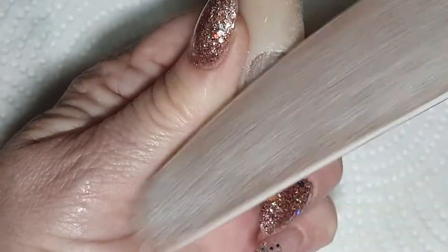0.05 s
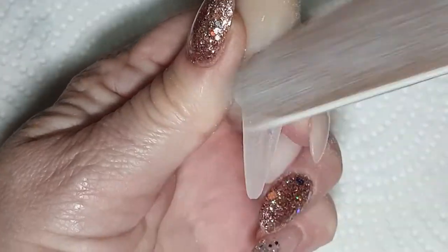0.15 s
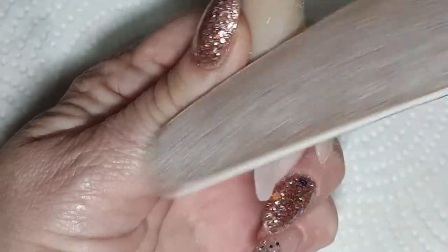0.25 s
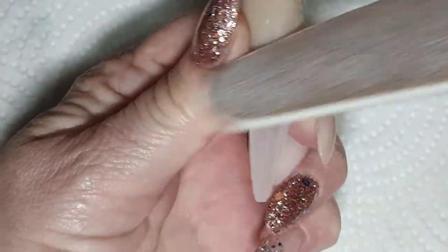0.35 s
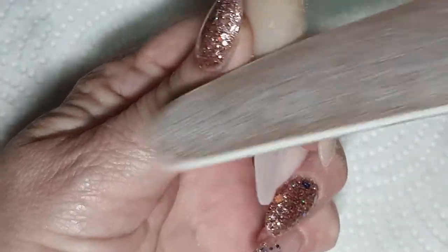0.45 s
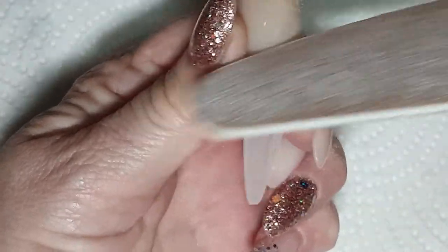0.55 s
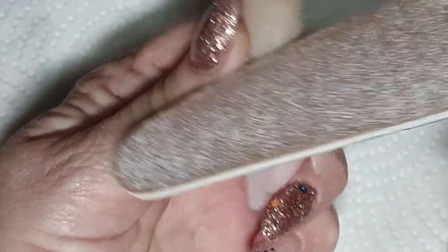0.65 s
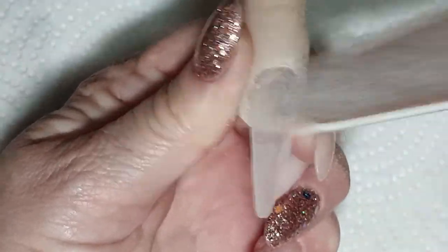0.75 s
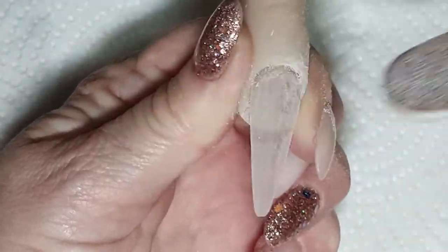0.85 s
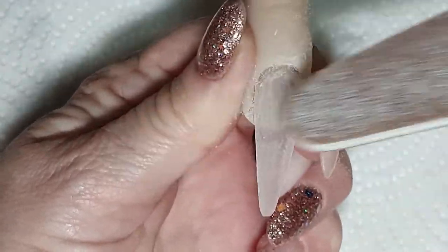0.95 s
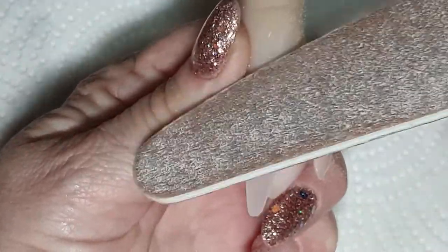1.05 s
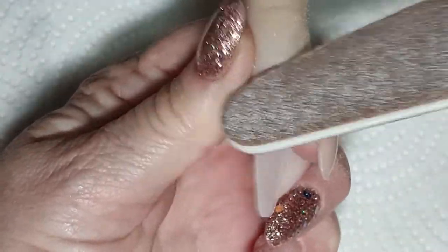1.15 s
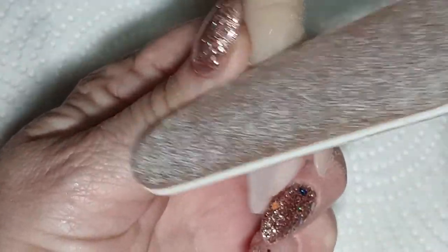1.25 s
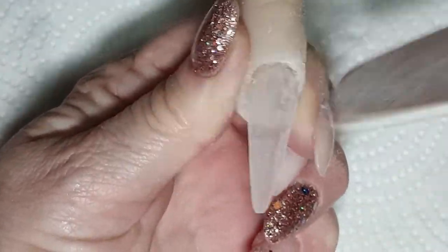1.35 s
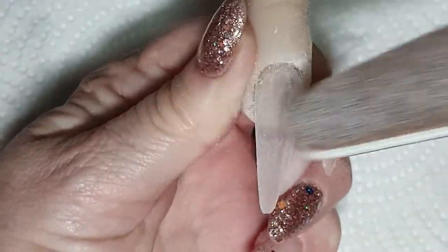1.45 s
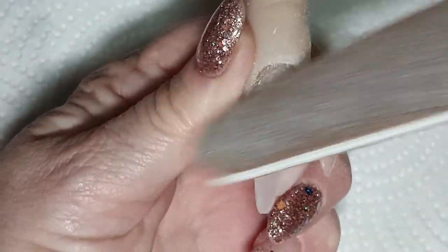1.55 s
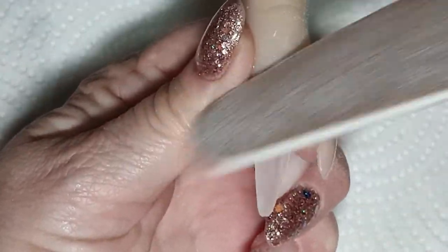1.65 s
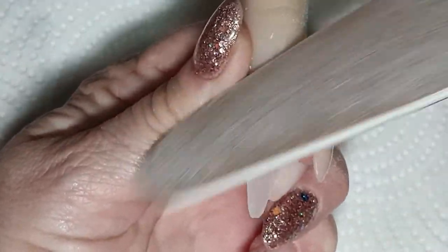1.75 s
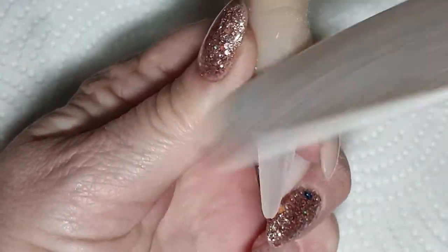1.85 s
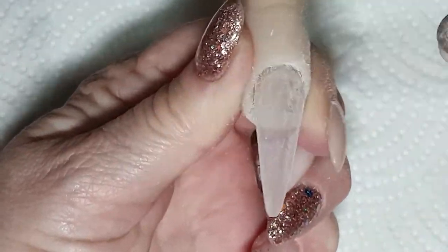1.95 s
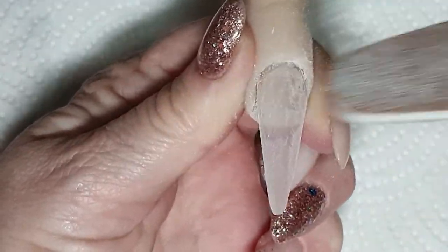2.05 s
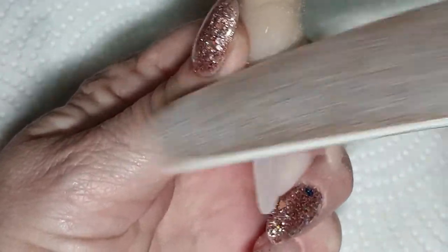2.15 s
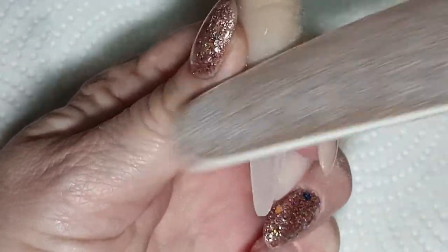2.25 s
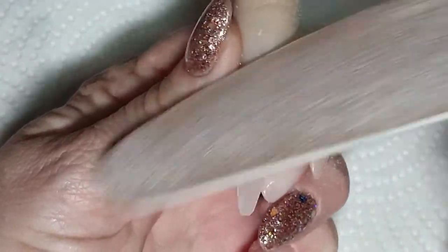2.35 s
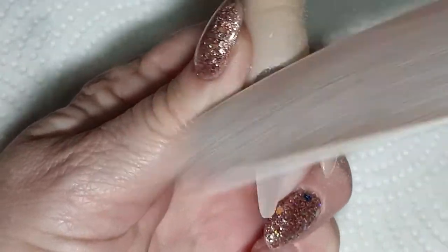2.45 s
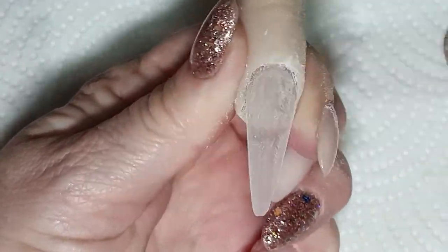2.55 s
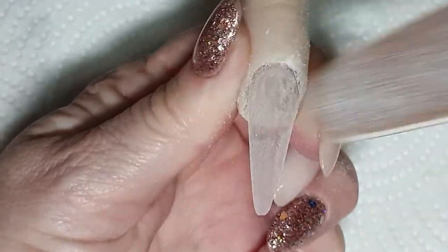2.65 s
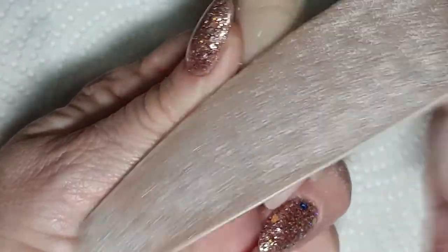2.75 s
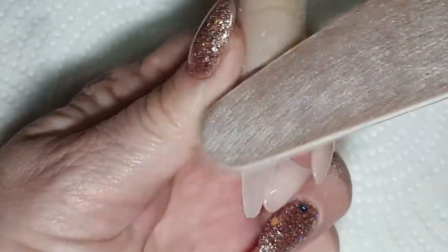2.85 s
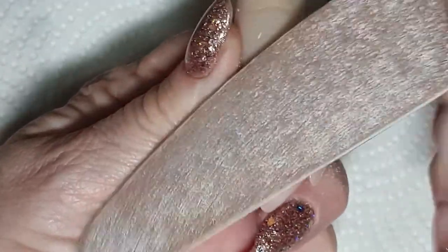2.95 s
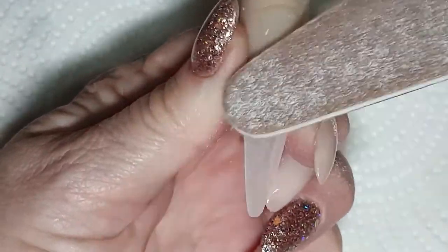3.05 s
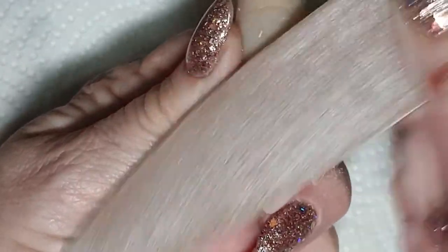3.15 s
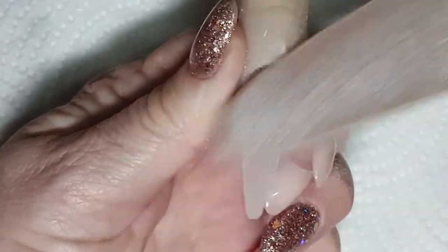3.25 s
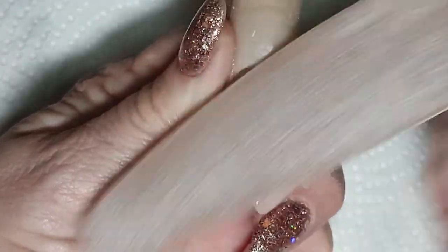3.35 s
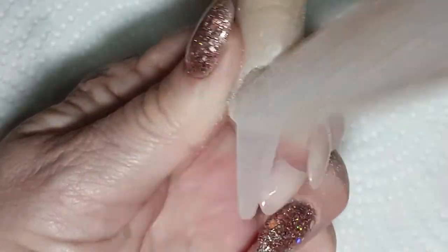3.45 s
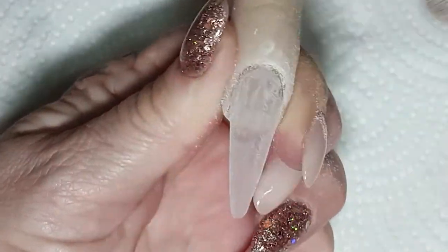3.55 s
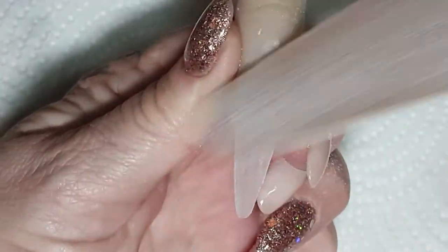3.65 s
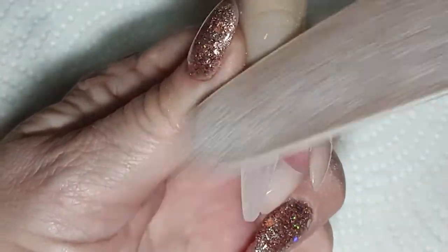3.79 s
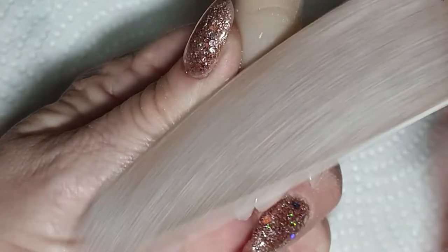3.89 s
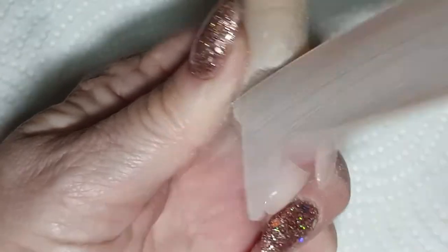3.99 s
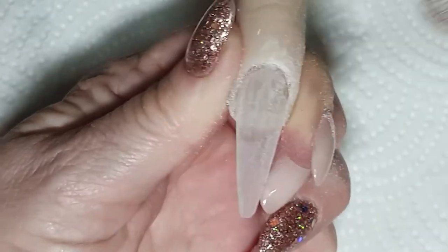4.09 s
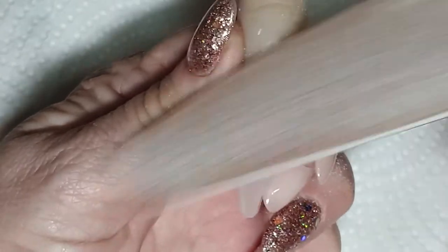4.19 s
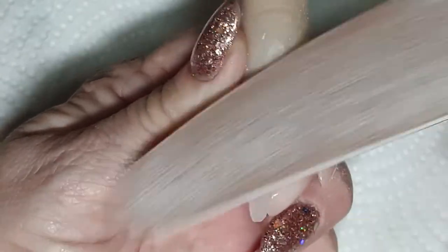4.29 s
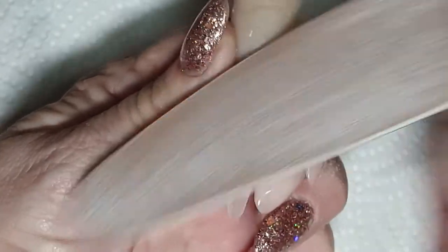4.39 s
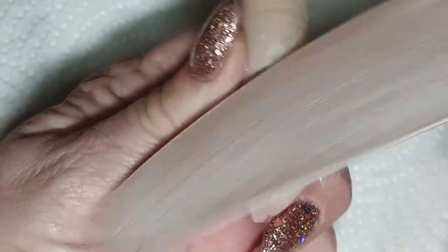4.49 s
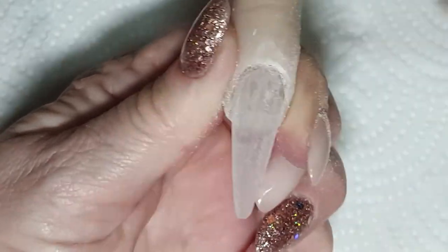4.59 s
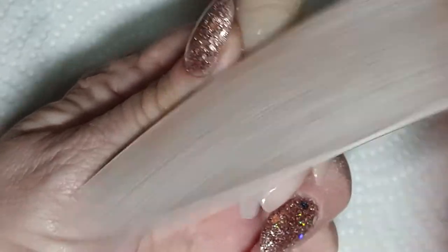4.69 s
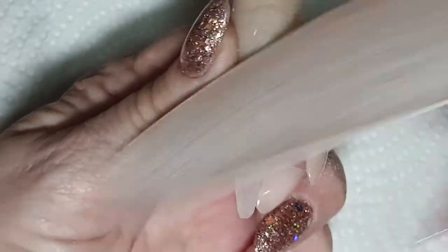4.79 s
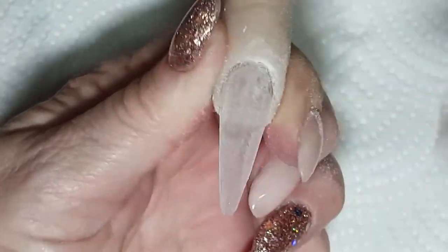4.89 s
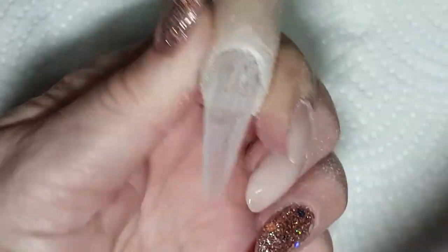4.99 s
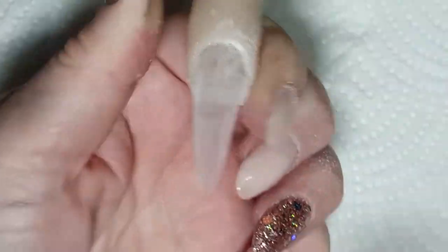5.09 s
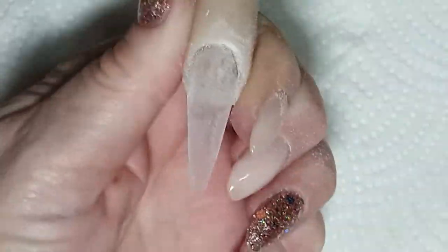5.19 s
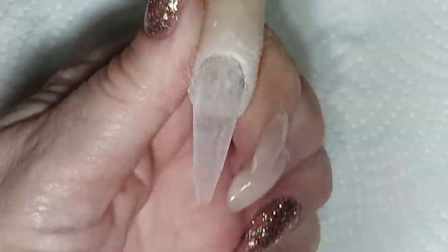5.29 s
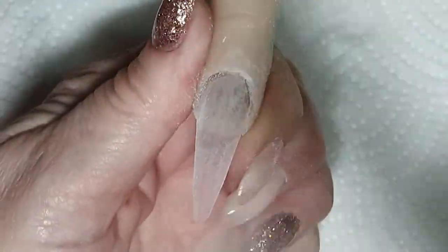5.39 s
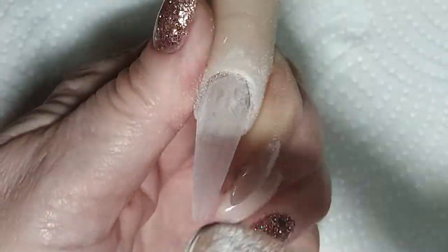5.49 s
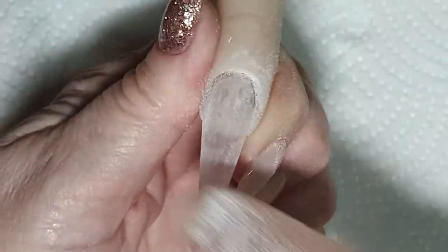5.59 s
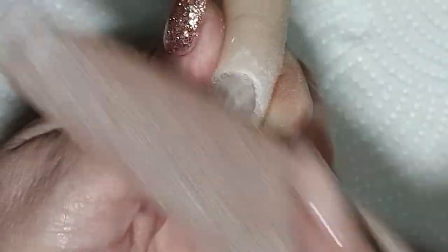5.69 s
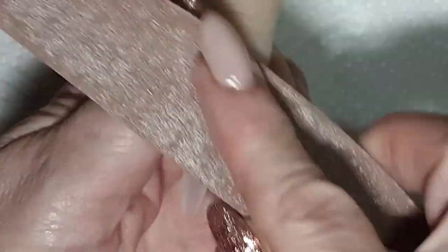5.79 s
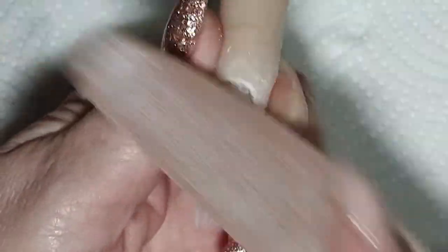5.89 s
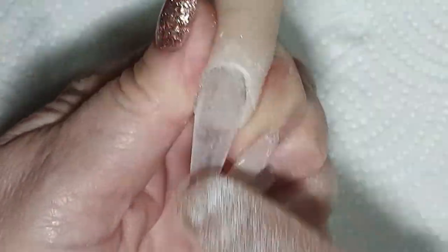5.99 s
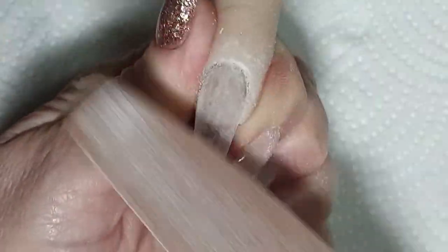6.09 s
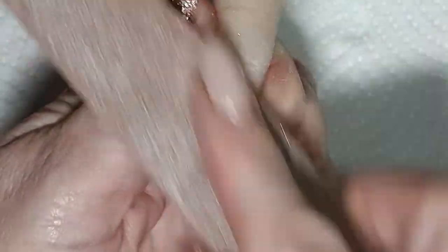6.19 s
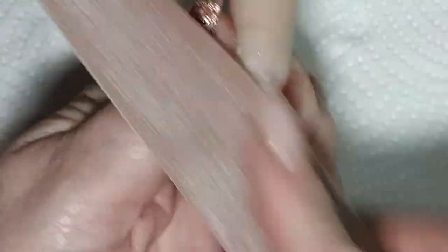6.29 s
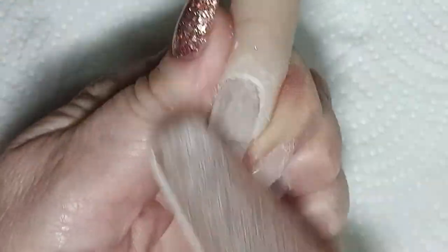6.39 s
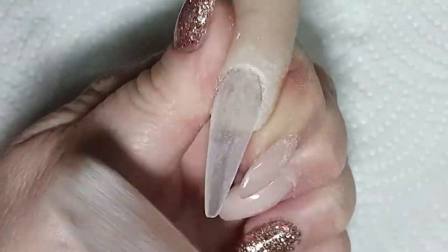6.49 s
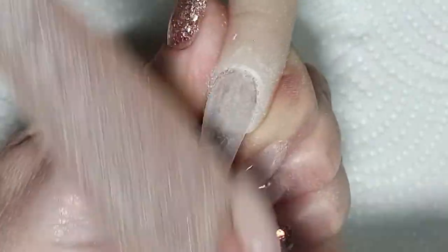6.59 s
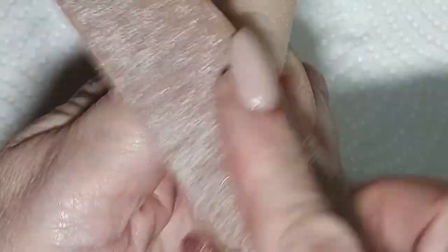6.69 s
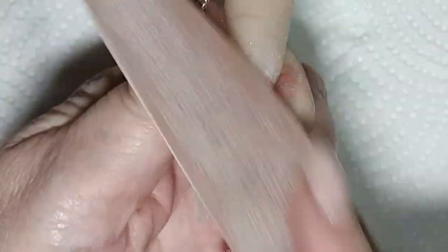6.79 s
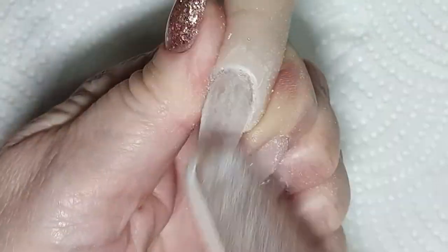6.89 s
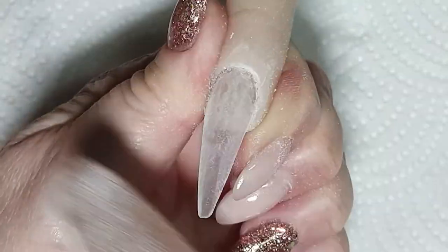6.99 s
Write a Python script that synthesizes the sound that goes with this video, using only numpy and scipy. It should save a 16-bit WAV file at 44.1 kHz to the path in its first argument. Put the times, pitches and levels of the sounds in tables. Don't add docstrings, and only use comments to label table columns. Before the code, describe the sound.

A close, dry recording of a nail file on a hard artificial nail in a small, lightly reverberant room. From 0 to 0.8 s, quick light scrapes alternate about ten per second, gritty and hissy, with a small hollow nail tone and a dull board flex. From 1 to 2.5 s they come in short bouts with gaps, a faint tick near 1.1 s. From 2.7 to 3.5 s a dense run of to-and-fro rasps grows louder and brighter, strongest around 3.3 to 3.5 s. Further strong bouts follow from 3.7 to 4.9 s. At 5.0 s a sharp, bright cluster of clicks sounds, then a crisp scrape at 5.2 s and near quiet. A hard tick at 5.85 s interrupts softer, longer edge sweeps at 5.75, 5.9, 6.2, 6.4 and 6.85 s, with tiny taps near 6.1 s. A faint low fan hum wavers throughout.

```python
import sys
import numpy as np
from scipy import signal
from scipy.io import wavfile
from scipy.ndimage import uniform_filter1d

SR = 44100
rng = np.random.default_rng(int(sys.argv[2]) if len(sys.argv) > 2 else 0)


def decibels_to_gain(level_db):
    exponent = np.asarray(level_db, float) / 20
    return 10 ** exponent


def wav_record(signal):
    frames = np.transpose(np.atleast_2d(signal))
    bounded = np.clip(frames, -1, 1)
    quanta = np.round(bounded * 32767).astype(np.int16)
    wavfile.write(sys.argv[1], SR, quanta)


N = 310464
TIME = np.arange(N) / SR


def unit(x):
    return x / np.sqrt(np.mean(x ** 2))


def noise():
    return rng.standard_normal(N)


def walk(rate_hz):
    hold = int(SR / rate_hz)
    steps = np.repeat(rng.standard_normal(N // hold + 1), hold)
    return unit(uniform_filter1d(uniform_filter1d(steps, hold), hold)[:N])


def ring(x, modes, patchy_db=0):
    out = 0
    for centre_hz, width_hz, level_db in modes:
        b, a = signal.iirpeak(centre_hz, centre_hz / (1.55 * width_hz), SR)
        flicker_db = patchy_db * walk(14) if patchy_db else 0
        mode = signal.lfilter(b, a, signal.lfilter(b, a, x))
        out = out + decibels_to_gain(level_db + flicker_db) * mode
    return out


def ports(make, alike):
    alike = np.clip(alike, 0, 1)
    shared = make()
    both = np.array([shared, np.roll(shared, 4)])
    return np.sqrt(alike) * both + np.sqrt(1 - alike) * np.array([make(), make()])


def swell(s, rise, fall, shape, square=1):
    i, j = max(int((s - rise) * SR), 0), int((s + fall) * SR)
    before = TIME[i:j] < s
    place = (TIME[i:j] - s) / np.where(before, -rise, fall)
    power = np.where(before, shape * square, shape)
    return slice(i, j), 1 - np.clip(place, 0, 1) ** power


# peak_s, half_length_s, shaft_tone_db, overtone_db, duct_drone_db
FAN_SURGES = [(.22, 0.23, -51.5, -57, -65), (0.495, 0.16, -46, -59, -73), (1.007, .17, -41.5, -48, -53.5),
              (1.553, .2, -57.5, -76, -77), (1.902, 0.33, -46, -51.5, -55.5), (2.21, 0.16, -43.5, -60, -68),
              (2.528, 0.16, -50, -54, -55), (2.912, 0.32, -50.5, -56, -53), (3.32, 0.21, -55, -66, -48),
              (3.51, 0.15, -54, -47.5, -45), (3.845, 0.11, -51.5, -56.5, -55), (4.104, 0.14, -62, -54, -49),
              (4.297, 0.19, -49.5, -52.5, -49.5), (4.913, 0.23, -79, -60, -54.5),
              (5.318, 0.51, -74, -57.5, -63), (5.712, 0.22, -52, -60, -59.5), (5.982, 0.27, -66, -61, -58),
              (6.409, .14, -51.5, -62, -42.5), (6.7, 0.12, -63, -57, -58), (6.945, .17, -49, -51, -52)]
# centre_hz, width_hz, level_db
DUCT_MODES = [(128.8, 19.6, -0.5), (159.8, 13.7, -1)]
# centre_hz, width_hz, level_db
FAN_NOISE = [(292, 20, -68), (30, 110, -68.5), (79.7, 24, -62)]
# centre_hz, width_hz, level_db
AIR_HISS = [(554, 397, -62.5), (1170, 1100, -107), (3470, 2400, -69), (6740, 3100, -65.5),
            (11100, 3100, -70), (15400, 3900, -71)]


def fan():
    idle_db = np.array([-67.5, -65, -62.5])
    power = np.ones((3, N)) * decibels_to_gain(idle_db)[:, None] ** 2
    for s, half_s, *levels_db in FAN_SURGES:
        span, hump = swell(s, half_s, half_s, 1.33)
        power[:, span] += (hump ** 1.62 * decibels_to_gain(levels_db)[:, None]) ** 2
    shaft, overtone, drone = np.sqrt(power)

    tones = 0
    for tone_hz, wobble_hz, size in [(59, 2.5, shaft), (110, 3, overtone)]:
        phase = 2 * np.pi * np.cumsum(tone_hz + wobble_hz * walk(11)) / SR
        skew = 0.36 * np.array([walk(3.36), walk(6.4)])
        tones = tones + size * np.sqrt(2) * np.sin(phase + skew)

    upper = 0
    for centre_hz, width_hz, level_db in FAN_NOISE:
        band = unit(ring(ports(noise, 0.49), [(centre_hz, width_hz, 0)]))
        upper = upper + decibels_to_gain(level_db + 2.0 * walk(2.9)) * band
    flutter = decibels_to_gain(1 * walk(4.8))
    upper = upper + drone * flutter * unit(ring(ports(noise, 0.96), DUCT_MODES))
    hiss = decibels_to_gain(-69.5) * unit(ring(ports(noise, 0.33), AIR_HISS))
    return tones * decibels_to_gain([[-4.0], [3.0]]) + upper * decibels_to_gain([[-1.5], [1.5]]) + hiss


# centre_hz, decay_t60_s, share_db
ROOM_BANDS = [(366, 0.98, -14.5), (1800, 0.29, -1.5), (6000, 0.57, -17), (13750, 0.35, -10.5)]


def room(x):
    t = np.arange(SR // 2) / SR
    tail = 0
    for centre_hz, t60_s, share_db in ROOM_BANDS:
        fade = np.exp(-np.log(1000) * t / t60_s) * (t > .004)
        band = ring(rng.standard_normal((2, len(t))), [(centre_hz, centre_hz, 0)])
        tail = tail + decibels_to_gain(share_db) * band * fade / np.sqrt(np.sum(fade ** 2))
    return signal.fftconvolve(x, tail, axes=1)[:, :N]


# start_s, peak_db, ring_hz, width_hz
EDGE_TAPS = [(0.0245, -37, 8660, 6000), (.6794, -50, 5190, 3000), (1.127, -36, 6500, 5000),
             (4.996, -28, 12400, 4000), (4.999, -21, 12300, 4500), (4.9993, -22, 4450, 2980),
             (5.002, -16, 12900, 4470), (5.0046, -26, 12700, 5000), (5.0183, -28.5, 4700, 1500),
             (5.034, -28.5, 4730, 1800), (5.0337, -26, 13500, 4000), (5.4292, -44, 2470, 1500),
             (5.44, -42, 11700, 6000), (5.8477, -15, 10000, 12100), (5.8476, -29, 4760, 4000),
             (6.064, -42, 11700, 6000), (6.0653, -27.5, 12500, 5000), (6.0936, -31, 12800, 5000),
             (6.0945, -42, 12100, 5000), (6.7412, -39, 905, 800)]


def taps():
    out = np.zeros((2, N))
    length, crack_s = 400, .0004
    for s, peak_db, ring_hz, width_hz in EDGE_TAPS:
        crack = rng.standard_normal((2, length)) * np.exp(-np.arange(length) / (crack_s * SR))
        tick = ring(crack[0] + .5 * crack, [(ring_hz, width_hz, 0)])
        i = int(s * SR)
        out[:, i:i + length] += decibels_to_gain(peak_db) * tick / np.abs(tick).max()
    return out


# fastest_s, level_db, rise_s, board_flex_db
PUSH_STROKES = [(.134, -44.5, 0.064, -5.5), (0.332, -40, 0.058, -6.5), (.524, -44, 0.05, -8.5),
                (0.789, -36.5, 0.072, -10.5), (1.067, -39, 0.032, -9.5), (1.155, -40, 0.041, -2.5),
                (1.367, -36, 0.062, -11), (1.696, -44, 0.049, 1), (1.91, -36, 0.078, -9),
                (2.29, -44.5, 0.047, -7.5), (2.509, -33.5, 0.064, -11.5), (2.869, -35, 0.056, -2),
                (3.064, -32, 0.055, -6.5), (3.273, -29.5, 0.069, -3.5), (3.48, -28, 0.048, -8.5),
                (3.813, -34.5, 0.055, -8.5), (4.026, -29.5, 0.067, -9.5), (4.33, -36, 0.048, -9),
                (4.546, -31, .066, -10), (4.88, -30, 0.1, -9)]
# fastest_s, level_db, rise_s, board_flex_db
PULL_STROKES = [(0.215, -34.5, .032, -13), (0.419, -42, 0.043, -10), (.617, -41, .037, -8.5),
                (1.238, -41.5, 0.03, -9), (1.788, -39, .049, -6), (2.39, -40, 0.05, -7.5),
                (2.775, -36, 0.022, -8), (2.96, -34, 0.047, -6.5), (3.16, -30.5, 0.048, -14),
                (3.383, -31.5, 0.059, -11), (3.909, -35.5, 0.042, -9.5), (4.43, -38, 0.048, -5.5)]
# fastest_s, level_db, rise_s, fall_s, board_flex_db
EDGE_SWEEPS = [(4.159, -59.5, 0.15, 0.079, -6), (4.744, -51, .012, .012, -26),
               (5.03, -58.5, 0.028, .14, 6.5), (5.175, -35.5, 0.066, 0.052, -17.5),
               (5.337, -55.5, 0.24, 0.18, 1), (5.506, -63.5, 0.023, 0.051, -8),
               (5.75, -36, 0.081, 0.073, -6.5), (5.907, -33, 0.065, .12, -12.5),
               (6.069, -54.5, 0.1, .046, -5.5), (6.215, -41, 0.057, 0.053, -2.5),
               (6.375, -37, 0.099, .115, -10), (6.755, -59, 0.023, .04, 10.5),
               (6.853, -36.5, 0.099, .15, -13.5)]
# touch_s, level_db, board_flex_db
FILE_LANDINGS = [(.019, -45, -7.5), (1.583, -45, -9), (2.174, -43, -12.5), (2.728, -41.5, -6.5),
                 (3.69, -37, -14), (4.215, -37.5, -8), (4.745, -35, -12), (6.157, -41, -13)]


def strokes():
    push_fall_s, pull_fall_s = 0.038, 0.054
    land_rise_s, land_fall_s = 0.025, 0.045
    brush_below_db = -46
    moves = [(0, s, db, rise, push_fall_s, flex) for s, db, rise, flex in PUSH_STROKES]
    moves += [(1, s, db, rise, pull_fall_s, flex) for s, db, rise, flex in PULL_STROKES]
    moves += [(2 + (db < brush_below_db), s, db, *rest) for s, db, *rest in EDGE_SWEEPS]
    moves += [(4, s + land_rise_s, db, land_rise_s, land_fall_s, flex) for s, db, flex in FILE_LANDINGS]
    return moves


def stroke_levels():
    fine_db, shape = [0, -0.5, 0, 2.5, 3], [1.37, 1.5, 1.42, 1.2, 1.3]
    nail_db, finger_db = [-9.5, -9, -7, -13, -11.5], [-16, -17.5, -13.5, -20, -20.5]
    usual_db = -36
    fine_gain, nail_loss, finger_loss = 0.078, 0.44, 0.5
    sharpness = np.array([[1], [1], [1.25], [1], [1]])
    power = np.zeros((5, N))
    for kind, s, db, rise, fall, board_db in strokes():
        span, hump = swell(s, rise, fall, shape[kind], 3.2 if kind == 4 else 1)
        extra = db - usual_db
        shares_db = np.array([0, board_db,
                              fine_db[kind] + fine_gain * extra,
                              nail_db[kind] - nail_loss * extra,
                              finger_db[kind] - finger_loss * extra])
        power[:, span] += (hump ** sharpness * decibels_to_gain(db + shares_db[:, None])) ** 2
    keep = np.exp(-1 / (.016 * SR))
    power[1] = signal.lfilter([1 - keep], [1, -keep], power[1])
    return np.sqrt(power)


def grains():
    grains_per_s, spread_db = 22000, 1.2
    loose = rng.random(N) < grains_per_s / SR
    force = decibels_to_gain(spread_db * rng.exponential(size=N))
    return unit(loose * force * rng.standard_normal(N))


def hand_echo(x):
    level_db, lag_s, drift = -7, 0.000895, 0.17
    bounce = [np.interp(TIME - lag_s * (1 + drift * walk(7)), TIME, port) for port in x]
    return x + decibels_to_gain(level_db) * np.array(bounce)


# centre_hz, width_hz, level_db
HOLLOW_BANDS = [(3720, 1000, 0), (4080, 1000, 0)]
# time_s, share_removed (0-1)
HOLLOW_DEPTH = [(0, .6), (1.0, .8), (2.8, .9), (4.9, .9), (5.7, .45), (7.04, .5)]


def wandering_dip(x):
    lower = np.clip(.5 + 1.2 * walk(11), 0, 1)
    dip = lower * ring(x, HOLLOW_BANDS[:1]) + (1 - lower) * ring(x, HOLLOW_BANDS[1:])
    return x - np.interp(TIME, *np.transpose(HOLLOW_DEPTH)) * dip


# time_s, fine_bite_db, finger_support_db, left_minus_right_db
HAND_GRIP = [(0, -9, -4, 1.5), (.65, -14.5, 1, 1.5), (1.2, -11, -1, 2.5), (2.4, -9.5, 1, 1),
             (3.0, -5.5, 0.5, 1.5), (3.7, -5.5, -0.5, 1), (4.3, -7.5, 0.5, .7), (5.15, 0.5, 1, -0.5),
             (5.7, -7.5, 2.5, -.7), (6.4, -10.5, 3, -1.2), (7.04, -7, 0.5, -0.7)]
# centre_hz, width_hz, level_db
GRIT_MODES = [(5040, 1220, -5), (5720, 1000, -5), (6500, 1230, 4.5), (7220, 890, 2), (7926, 770, -0.5),
              (8614, 1770, -1)]
# centre_hz, width_hz, level_db
FINE_MODES = [(9840, 4200, -21), (12400, 1800, -8), (13200, 1850, -14), (14400, 4100, -4)]
# centre_hz, width_hz, level_db
NAIL_MODES = [(1929, 387, -1), (2221, 237, -4), (2536, 900, 5), (3470, 870, 4.5)]
# centre_hz, width_hz, level_db
FINGER_MODES = [(580, 210, -9.5), (774, 407, 0.5), (1119, 550, -2.1), (1421, 610, 1.5), (1705, 494, -3.5)]
# centre_hz, width_hz, level_db
BOARD_MODES = [(251.6, 73, -8.5), (290.2, 66, 3), (352, 102, -4), (418, 37, -11.5)]


def filing():
    speed, board, fine, nail, finger = stroke_levels()
    t, *columns = np.transpose(HAND_GRIP)
    bite_db, support_db, pan_db = (np.interp(TIME, t, column) for column in columns)
    patchy_db = 1.6

    tear = ports(grains, 0.33) * decibels_to_gain(1.8 * walk(45))
    coarse = signal.sosfilt(signal.butter(3, 10000, fs=SR, output="sos"), tear)
    out = speed * unit(ring(coarse, GRIT_MODES, patchy_db))
    out += fine * decibels_to_gain(bite_db) * unit(ring(tear, FINE_MODES, patchy_db))

    knock = ports(grains, 0.51)
    out += nail * unit(ring(knock, NAIL_MODES, patchy_db))
    out += finger * decibels_to_gain(support_db) * unit(ring(knock, FINGER_MODES, patchy_db))
    out = wandering_dip(hand_echo(out) * decibels_to_gain(np.array([pan_db, -pan_db]) / 2))

    flex = signal.sosfilt(signal.butter(4, 520, fs=SR, output="sos"), ports(noise, 0.89))
    return out + board * decibels_to_gain([[-1.1], [1.1]]) * unit(ring(flex, BOARD_MODES, patchy_db=2.5))


def scene():
    near = filing() + taps()
    return near + room(near) + fan()


def band_limit(x):
    return signal.sosfilt(signal.butter(12, 16830, fs=SR, output="sos"), x)


def record(dry):
    ceiling, top_hz = .26, 15950
    rounded = ceiling * np.tanh(dry / ceiling)
    mix = signal.sosfilt(signal.ellip(8, .2, 45, top_hz, fs=SR, output="sos"), rounded)
    return band_limit(mix)


dry = scene()
out = record(dry)
wav_record(out)
```